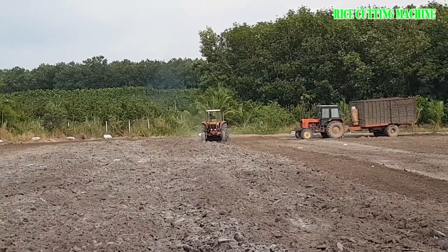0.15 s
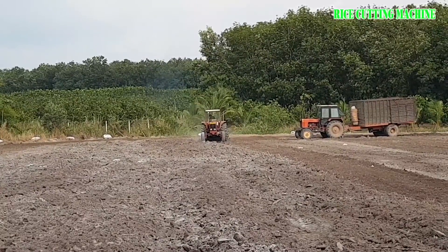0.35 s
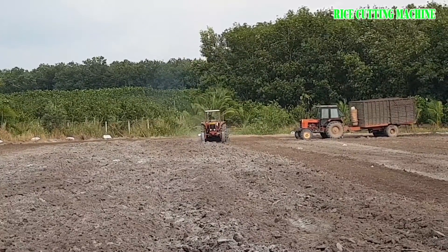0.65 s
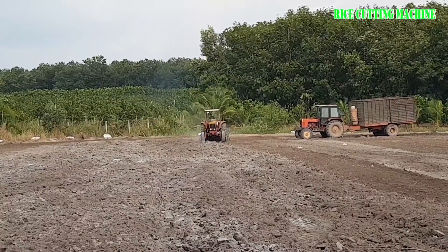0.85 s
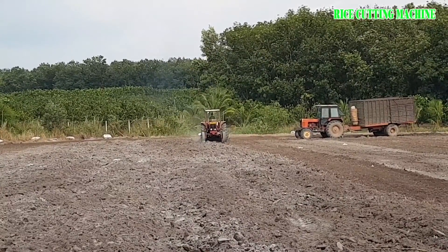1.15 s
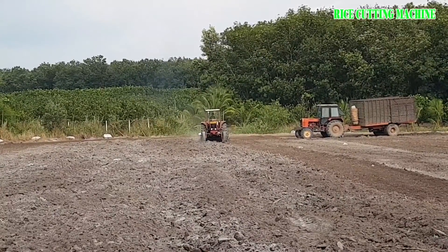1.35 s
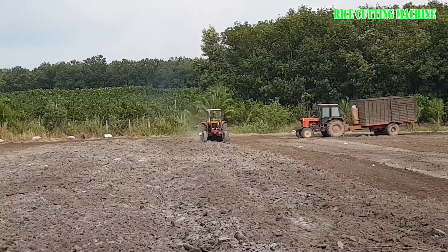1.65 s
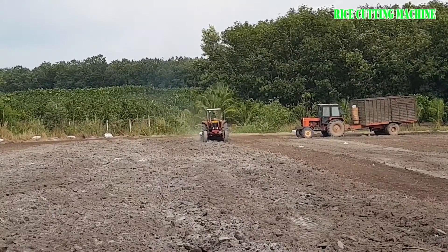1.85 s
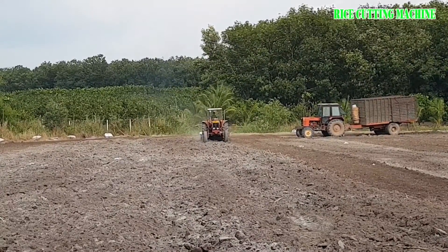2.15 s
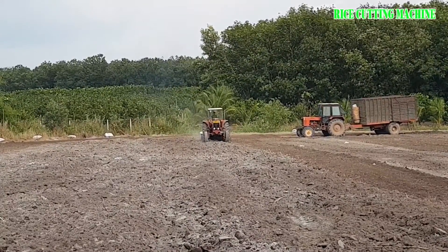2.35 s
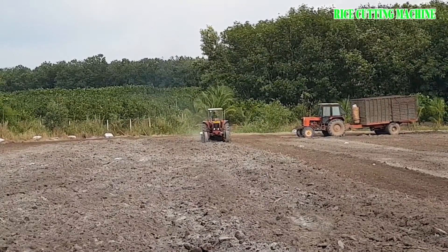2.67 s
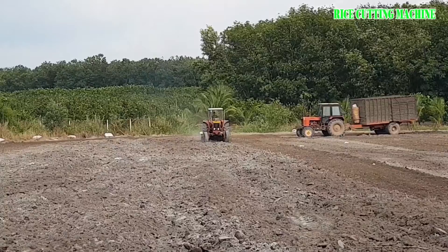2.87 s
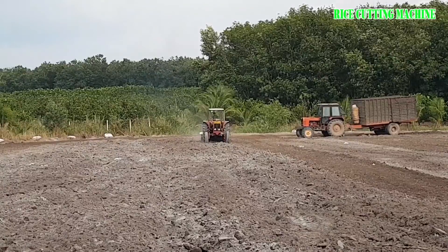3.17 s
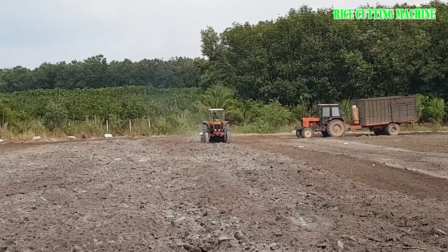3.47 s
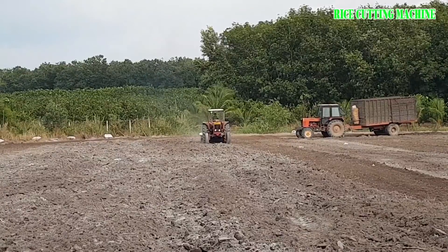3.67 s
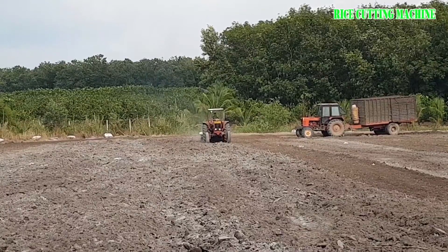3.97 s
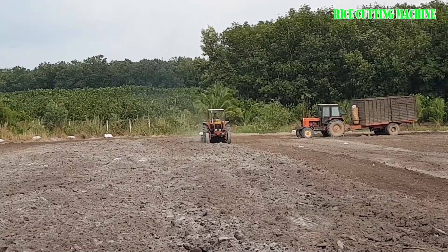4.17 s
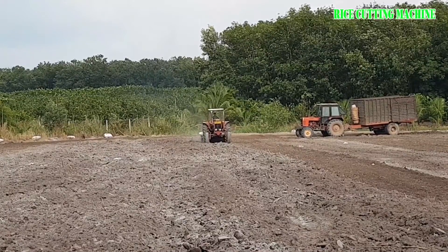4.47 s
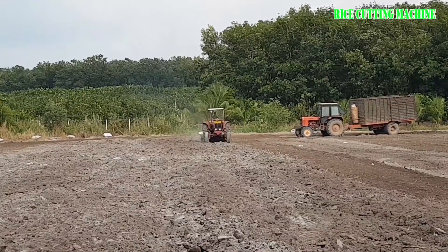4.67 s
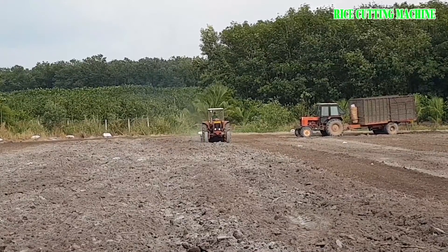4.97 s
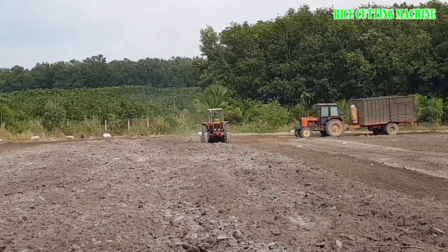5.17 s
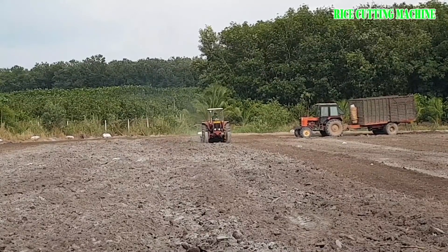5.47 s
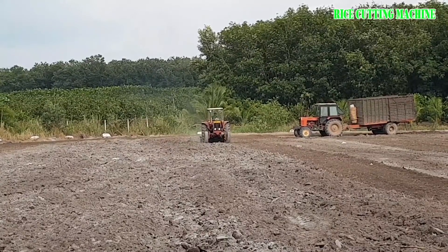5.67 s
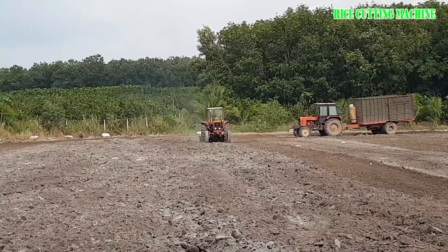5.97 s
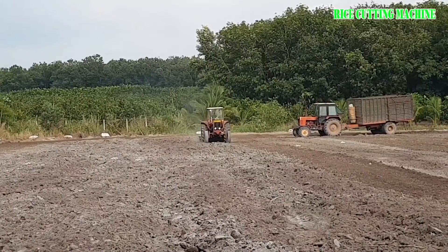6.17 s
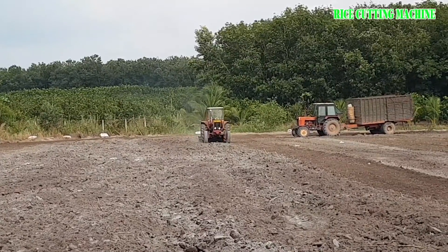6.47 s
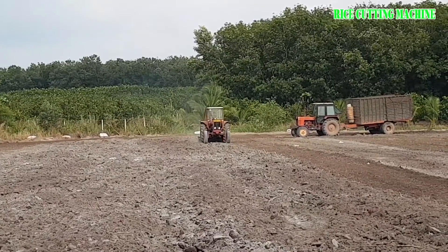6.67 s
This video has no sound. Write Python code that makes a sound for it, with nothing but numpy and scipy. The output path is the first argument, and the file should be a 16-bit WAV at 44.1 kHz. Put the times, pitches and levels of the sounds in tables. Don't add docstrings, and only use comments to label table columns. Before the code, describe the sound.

A dog close by, a little to the right, gives hoarse, clipped barks, four in the first two seconds or so with a faint yip among them, then a low grumble, a long pause and one last higher bark. Far off an old diesel tractor drones steadily, its clatter swelling and dimming in the air. Short echoes come from trees and walls; light wind rumbles on the microphone.

```python
import sys
import numpy as np
from scipy import signal
from scipy.fft import rfft, irfft, next_fast_len
from scipy.io import wavfile
from scipy.ndimage import uniform_filter1d, map_coordinates

SR = 44100
rng = np.random.default_rng(int(sys.argv[2]) if len(sys.argv) > 2 else 0)


def ratio_of_db(decibels):
    return 10 ** (np.asarray(decibels, float) / 20)


def output_pcm(signal):
    pcm = np.clip(np.atleast_2d(signal).T, -1, 1) * 32767
    wavfile.write(sys.argv[1], SR, np.round(pcm).astype(np.int16))


N = 300762

# (time [s], firing rate [1/s])
FIRING_RATE = [(0.0, 55.02), (0.64, 55.89), (0.95, 54.81), (1.53, 55.16), (2.38, 53.19), (2.66, 55.43),
               (4.37, 54.02), (5.4, 54.51), (5.54, 53.91), (6.0, 55.03), (6.54, 54.1), (6.82, 55.38)]
# (time [s], level [dB])
PIPE_LOAD = [(0, -53), (.45, -53), (1, -51.5), (1.8, -49.5), (2.5, -49), (3, -52), (3.5, -51), (4, -52.5),
             (4.35, -49.5), (4.9, -49), (5.3, -49.5), (5.6, -48), (6.1, -49), (6.82, -47.5)]
# (time [s], level [dB], treble [dB])
AIR_CARRY = [(0, -76, -18), (.4, -62, 0), (.74, -51.5, -6.5), (1.1, -48.5, 3), (1.37, -48.5, 2.5),
             (1.7, -46.5, -7), (2.2, -42, -7), (2.6, -43, -3), (2.8, -53, -2.5), (3.02, -55, -3.5),
             (3.5, -49.5, -5), (3.85, -58, 3), (4.5, -53, 1), (4.98, -55.5, -0.5), (5.3, -47, -4.5),
             (5.7, -44.5, 2.5), (6.25, -44, -3.5), (6.82, -44, 0.5)]
# (time [s], firing rate [1/s], level [dB])
SECOND_ENGINE = [(0, 81, -65), (.5, 65, -44), (.9, 65, -58), (1.6, 76, -65), (1.9, 77, -50.5),
                 (2.6, 77, -44), (3.1, 78, -38.5), (3.4, 78, -43.5), (3.5, 58.4, -35), (4.55, 58.4, -43.5),
                 (4.85, 58.4, -45), (5.6, 74, -37), (6.4, 78, -44), (6.82, 78, -37)]
# (pipe [dB], knock [dB], fizz [dB])
CYLINDERS = [(4.5, -.7, 1), (-1, -.3, -1), (0, .7, .3), (.5, .7, 0)]
# (centre [Hz], width [Hz], level [dB])
PIPE_MODES = [(508, 92, 0), (731, 94, 0.5), (986.5, 52, 2), (1194, 247, 0)]
# (centre [Hz], width [Hz], level [dB])
BLOCK_MODES = [(1600, 245, -2), (1965, 180, 1), (2440, 206, 0.5)]
# (centre [Hz], width [Hz], level [dB])
PANEL_MODES = [(2898, 230, 6), (3310, 236, 2.5), (3594, 120, 6.5), (3932, 123, 4.5), (4270, 280, -1),
               (5030, 290, -8)]
# (frequency [Hz], density [dB per Hz])
FIZZ_SPECTRUM = [(2650, -10.5), (4500, -7), (4810, -13), (5480, -8), (6310, -1.5), (7290, -7), (8650, -6.5),
                 (9260, -9), (10500, -4.5), (14200, -13), (14700, -24), (15600, -54)]
# (frequency [Hz], likeness [0-1])
ALIKE = [(200, .85), (600, .85), (1500, .8), (3000, .75), (5000, .4), (8000, .38), (14000, .22)]
# (frequency [Hz], lead [rad])
LEFT_LEAD = [(200, 0), (3400, -.2), (4900, .9), (6200, -.6), (10000, -.9), (14000, -1.3)]
# (frequency [Hz], left minus right [dB])
LEFT_BALANCE = [(100, -.6), (2000, -.3), (6000, -.7), (12000, -2.5)]
# (start [s], length [s], peak [dB], sag over the length [dB], top pitch [Hz])
BARKS = [
    (0.044, 0.14, -20, -8, 310),
    (0.647, 0.16, -19, -18, 310.7),
    (1.033, 0.11, -40.5, -6.5, 361),
    (1.311, .131, -20, -6, 309.3),
    (2.084, 0.14, -19, -5, 305.7),
    (2.627, .18, -46.5, -8.5, 293),
    (4.488, 0.12, -20, -3, 361.4),
]
# (time [s], second fold rate [Hz], noise share [0-1], throat scale [ratio], chest [dB])
CRACKS = [
    (0.106, 503.5, 0.49, 1.03, -19.5),
    (0.723, 503.7, 0.41, 1.016, -20.5),
    (1.03, 552, 0.98, 1.175, -33),
    (1.353, 508, 0.58, 1.018, -21),
    (2.146, 495, 0.5, 0.996, -20),
    (2.63, 403, 0.9, 0.92, -3),
    (4.49, 572.5, 0.72, 1.104, -16),
]
# (centre [Hz], width [Hz], level [dB])
THROAT_MODES = [(470, 176, 0), (644, 175, 2.5), (836, 180, -4.5)]
# (centre [Hz], width [Hz], level [dB])
MOUTH_MODES = [(1004, 232, 3), (1256, 210, 3), (1449, 147, 2)]
# (centre [Hz], width [Hz], level [dB])
CHEST_MODES = [(268, 63, 6), (437, 190, -12)]
# (centre [Hz], width [Hz], level [dB])
GAPE_MODES = [(1590, 102, 2), (2350, 880, -7.5), (5460, 6600, -13.5)]
# (frequency [Hz], t60 [s])
YARD_T60 = [(300, 0.26), (1500, 0.28), (6000, 0.7)]
# (time [s], level [dB])
GUSTS = [(0, -47), (.4, -45), (.9, -48.5), (1.6, -47), (1.92, -42.5), (2.06, -39), (2.24, -43.5),
         (2.39, -39), (2.7, -43.5), (2.85, -42), (3.5, -45.5), (4.0, -50.5), (4.5, -47), (4.9, -44.5),
         (5.0, -36), (5.3, -43.5), (5.75, -40), (6.82, -45)]
# (frequency [Hz], density [dB per Hz])
RUMBLE_SPECTRUM = [(25, -45), (40, -13), (55, 0), (75, 7.5), (100, -1.5), (130, -2), (170, -41.5)]
# (frequency [Hz], density [dB per Hz])
FLUTTER_SPECTRUM = [(100, 0.5), (130, 6), (170, 1.5), (230, -7), (400, -30), (600, -32)]
# (frequency [Hz], density [dB per Hz])
FIELD_SPECTRUM = [(180, -30), (300, 1), (674, -21), (849, -13), (1040, -4), (1390, -20), (1700, -6),
                  (3130, -9), (6380, -9), (13000, -27.5), (15600, -43)]


def unit(x):
    return x / np.sqrt(np.mean(x ** 2) + 1e-20)


def along(points, hz):
    f, v = np.transpose(points)
    return np.interp(np.log(hz + 1), np.log(f + 1), v)


def curves(rows, t_s):
    s, *columns = np.transpose(rows)
    return [np.interp(t_s, s, column) for column in columns]


def wobble(rate_hz, size):
    knots = rng.standard_normal(int(size * rate_hz / SR) + 4)
    return map_coordinates(knots, [np.arange(size) * rate_hz / SR])


def filtered(x, response):
    m = next_fast_len(x.shape[-1] + 8192)
    return irfft(rfft(x, m) * response(np.fft.rfftfreq(m, 1 / SR)), m)[..., :x.shape[-1]]


def modes(table):
    def response(f):
        total = 0
        for k, (centre, width, db) in enumerate(table):
            damping = 1j * f * width
            total = total + (-1) ** k * ratio_of_db(db) * damping / (centre * centre - f * f + damping)
        return total
    return response


def colour(spectrum):
    return lambda f: ratio_of_db(along(spectrum, f))


def rush(gate, response, alike, patchy_db):
    m = next_fast_len(N + 8192)
    f = np.fft.rfftfreq(m, 1 / SR)
    turn = np.arccos(np.clip(along(alike, f), -1, 1)) / 2
    lead = np.exp(.5j * along(LEFT_LEAD, f))
    lean = ratio_of_db(along(LEFT_BALANCE, f) / 2)
    noise = rfft(gate * rng.standard_normal((2, N)), m) * response(f)
    mid, side = noise * [np.cos(turn), np.sin(turn)]
    pair = irfft(np.array([(mid * lead + side) * lean, (mid / lead - side) / lean]), m)[:, :N]
    z = signal.stft(pair.astype(np.float32), nperseg=256)[2]
    patches = uniform_filter1d(rng.standard_normal(z.shape[1:]), size=3, axis=0)
    patches = unit(uniform_filter1d(patches, size=7, axis=1))
    return unit(signal.istft(z * ratio_of_db(patchy_db * patches), nperseg=256)[1][:, :N])


def puffs(turns, cylinder_db, rise, scatter_db, between):
    k = turns.astype(int)
    size, late = rng.standard_normal((k.max() + 1, 2))[k].T
    u = np.clip(turns % 1 - 0.03 * np.abs(late), 0, 1) / rise
    puff_db = scatter_db * size + np.array(cylinder_db)[k % len(cylinder_db)]
    return between + ratio_of_db(puff_db) * u * np.exp(1 - u)


def exhaust_hum(turns, load_db):
    shimmer_db = 1.36
    first_db = -36 + 1.53 * load_db + shimmer_db * wobble(5.3, N)
    second_db = -39 + 1.23 * load_db + shimmer_db * wobble(9, N)
    hum = ratio_of_db(first_db + 2.5) * np.cos(2 * np.pi * (turns + .858))
    hum += ratio_of_db(second_db + 2.5) * np.cos(4 * np.pi * (turns + .184))
    hum += ratio_of_db(second_db - 19.0) * np.cos(6 * np.pi * (turns + 0.054))
    cancel_s = 4.06
    other_hz, other_db = curves(SECOND_ENGINE, np.arange(N) / SR)
    gain = np.cumsum(other_hz) / SR - turns
    gain -= gain[round(cancel_s * SR)]
    return hum - ratio_of_db(other_db + 3) * np.cos(2 * np.pi * (turns + .83 + gain))


def tractor():
    t = np.arange(N) / SR
    turns = .17 + np.cumsum(curves(FIRING_RATE, t)[0]) / SR
    pipe_db = curves(PIPE_LOAD, t)[0]
    panel_db, treble_db = curves(AIR_CARRY, t)
    load_db = pipe_db - pipe_db.mean()
    carry_db = panel_db - panel_db.mean()
    block_db = -51.5 + .4 * carry_db + 1.68 * load_db + 0.17 * treble_db
    fizz_db = panel_db + treble_db
    hum = exhaust_hum(turns, load_db)

    pipe, knock, fizz = np.transpose(CYLINDERS)
    pipe_gate = puffs(turns + .33, pipe, rise=.11, scatter_db=1.3, between=.45)
    block_gate = puffs(turns + .27, knock, rise=.12, scatter_db=1.1, between=.3)
    panel_gate = puffs(turns + .27, knock, rise=.12, scatter_db=1.1, between=.28)
    fizz_gate = puffs(turns + .26, fizz, rise=.12, scatter_db=1.6, between=.26)
    out = ratio_of_db(pipe_db + 1.5) * rush(pipe_gate, modes(PIPE_MODES), ALIKE, patchy_db=1.2)
    out += ratio_of_db(block_db + 1.5) * rush(block_gate, modes(BLOCK_MODES), ALIKE, patchy_db=1.2)
    out += ratio_of_db(panel_db + 1.5) * rush(panel_gate, modes(PANEL_MODES), ALIKE, patchy_db=1.2)
    out += ratio_of_db(fizz_db + 1.5) * rush(fizz_gate, colour(FIZZ_SPECTRUM), ALIKE, patchy_db=2.2)
    return out + hum * ratio_of_db([[-.3], [.3]])


def fold_clicks(hz, jitter):
    cycle = np.cumsum(hz * (1 + jitter * wobble(394.4, len(hz)))) / SR
    return unit(np.exp(12 * (np.cos(2 * np.pi * cycle) - 1)) * ratio_of_db(1.2 * wobble(148, len(hz))))


def cavity(x, table, scale=1):
    return unit(filtered(x, lambda f: modes(table)(f / scale) ** 2))


def blend(tone, noise, share):
    return np.sqrt(1 - share) * tone + np.sqrt(share) * noise


def bark(t, event, crack):
    start_s, length_s, peak_db, sag_db, top_hz = event
    crack_s, second_hz, share, scale, chest_db = crack
    age = t - start_s
    attack_s = 0.0289 + .04 * max(share - .5, 0)
    full_s = max(crack_s - start_s, attack_s + 0.0047)
    scoop = .19 * np.exp(-age / .026)
    droop = 1.4 * np.clip(age - full_s, 0, length_s - full_s)
    hz = top_hz * (1 - scoop - droop)

    level_db = np.interp(age, [0, attack_s, full_s, full_s + 0.0066, length_s], [-21, -1.5, 0, -3, sag_db])
    level_db += peak_db - 297 * np.clip(age - length_s, 0, 1)
    bright_db = -20.5 + 11.5 * share + 41.5 * age
    bright_db -= 120 * np.clip(age - 0.69 * length_s, 0, 1)

    cracked = np.clip((t - crack_s) / 0.007, .06, 1)
    hoarse = np.clip(share, 0, 1) * cracked
    folds = fold_clicks(hz, 0.027)
    rasp = (1.23 + folds) * rng.standard_normal(len(t))
    second = fold_clicks(np.full(len(t), second_hz), 0.0238)
    clear = (1 - 0.54 * cracked) * folds + 0.85 * cracked * second

    throat = [cavity(v, THROAT_MODES, scale) for v in (clear - clear.mean(), rasp)]
    sharp = np.gradient(np.gradient(clear))
    mouth = [cavity(v, MOUTH_MODES, np.sqrt(scale)) for v in (sharp, rasp)]
    voice = blend(*throat, hoarse) + ratio_of_db(bright_db + 8) * blend(*mouth, .18 + .82 * hoarse)
    chest_db = chest_db + 0.067 * (level_db - level_db.max())
    voice += ratio_of_db(chest_db) * cavity(rasp + 0.23 * folds, CHEST_MODES)
    wide = np.sin(np.pi * np.clip(age / (1.2 * length_s), 0, 1)) ** 2
    voice += ratio_of_db(bright_db - 3.5) * wide * cavity(rasp, GAPE_MODES, np.sqrt(scale))
    fade = np.clip(np.minimum(t - t[0], t[-1] - t) / 0.0063, 0, 1)
    return fade * ratio_of_db(level_db) * voice


def dog():
    out = np.zeros(N)
    tail_s = 0.091
    for event, crack in zip(BARKS, CRACKS):
        start_s, length_s = event[:2]
        t = np.arange(start_s, start_s + length_s + tail_s, 1 / SR)
        out[round(start_s * SR):][:len(t)] += bark(t, event, crack)
    return out


def yard(x, wait_s):
    noise = [[1, .55], [1, -.55]] @ rng.standard_normal((2, SR // 2))
    hz, t, z = signal.stft(noise, SR, nperseg=256)
    decay_db = -60 * t / along(YARD_T60, hz)[:, None]
    tail = signal.istft(z * ratio_of_db(decay_db), SR, nperseg=256)[1]
    delayed = np.pad(x, ((0, 0), (round(wait_s * SR), 0)))
    return signal.fftconvolve(delayed, tail / np.linalg.norm(tail[0]), axes=1)[:, :N]


def wind():
    gust_db = curves(GUSTS, np.arange(N) / SR)[0]
    flutter_db = -51 + gust_db - gust_db.mean()
    rumble = rush(ratio_of_db(2.2 * wobble(9, N)), colour(RUMBLE_SPECTRUM), [(60, .85)], patchy_db=.6)
    flutter_alike = [(130, 1.0), (300, 0.77)]
    flutter = rush(ratio_of_db(3.8 * wobble(12, N)), colour(FLUTTER_SPECTRUM), flutter_alike, patchy_db=-2.6)
    hiss = rush(np.ones(N), colour(FIELD_SPECTRUM), ALIKE, patchy_db=2.5)
    return ratio_of_db(gust_db + 1.5) * rumble + ratio_of_db(flutter_db + 2.5) * flutter + ratio_of_db(-51.5) * hiss


def scene():
    near = dog()
    late = np.pad(near, (17, 0))[:N]
    pair = np.array([ratio_of_db(.1) * late, ratio_of_db(2.5) * near])
    echoes = ratio_of_db(-3.5) * yard(pair, wait_s=.012) + ratio_of_db(-32.0) * yard(pair, wait_s=0.29)
    return pair + echoes + tractor() + wind()


def band_limit(x):
    return signal.sosfilt(signal.butter(12, 15710, fs=SR, output="sos"), x)


def record(dry):
    return band_limit(dry)


dry = scene()
out = record(dry)
output_pcm(out)
```